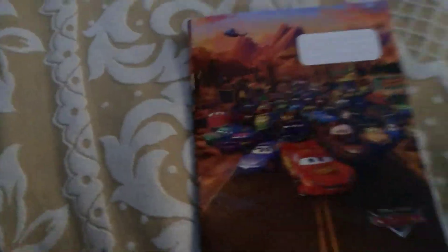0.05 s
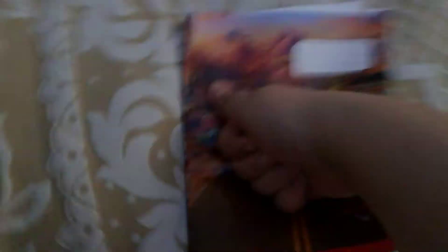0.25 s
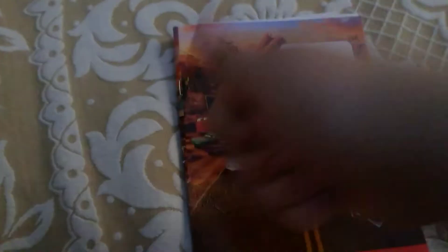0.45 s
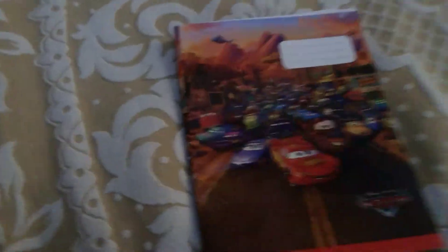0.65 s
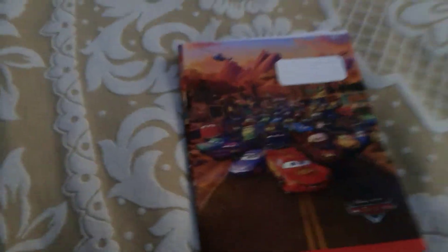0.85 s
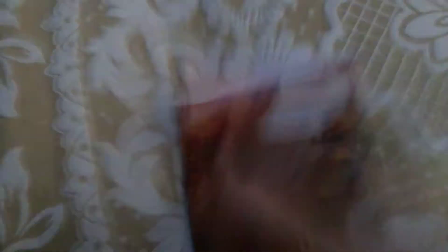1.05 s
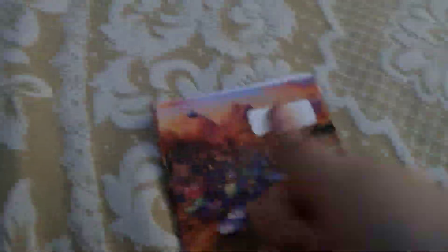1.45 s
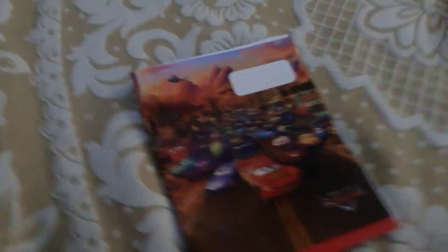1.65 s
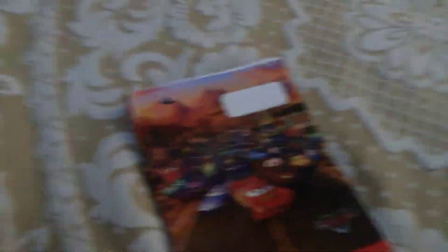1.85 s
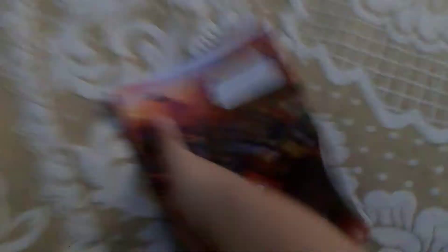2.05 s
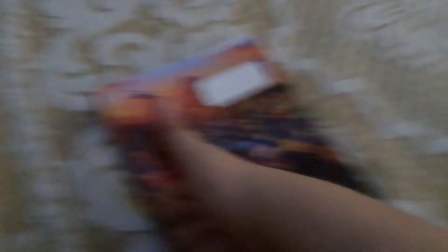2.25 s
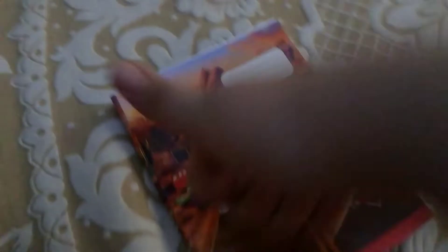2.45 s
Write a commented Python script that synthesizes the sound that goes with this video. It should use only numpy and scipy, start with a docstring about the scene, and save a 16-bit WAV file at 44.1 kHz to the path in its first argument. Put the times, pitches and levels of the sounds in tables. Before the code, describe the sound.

A fist thumps a notebook on a table at about 0.2, 1.1 and 2.1 seconds, each sharp hit overloading the close microphone and ringing briefly in a small room. Paper snaps accompany the last two blows, and a hollow tock comes at 1.35 seconds. A hand brushes softly, and the held camera clicks or creaks around 0.4, 1.6 and 2.4 seconds. A faint appliance whine lies underneath.

```python
"""A small, hard room, where a fist thumps a notebook on a cloth-covered table three times.
Each impact excites the damped modes of cover, pages and table, sets the room reverberating
and overloads the microphone of a hand-held camera. Between blows come a hollow tock, snaps of paper,
the friction noise of skin and sleeve, and the clicks and stick-slip creaks of the camera's case.
Still air and a faint appliance whine lie underneath."""
import sys
import numpy as np
from scipy import signal
from scipy.fft import rfft, irfft, next_fast_len
from scipy.io import wavfile

SR = 44100
rng = np.random.default_rng(int(sys.argv[2]) if len(sys.argv) > 2 else 0)


def persist_wave(psi):
    """Save psi, clipped to +-1, as 16-bit WAV."""
    counts = np.round(np.clip(psi, -1, 1) * 32767).astype(np.int16)
    wavfile.write(sys.argv[1], SR, np.atleast_2d(counts).T)


N = 110250


def amp(db):
    """Amplitude ratio of a level in decibels."""
    return 10 ** (np.asarray(db) / 20)


def unit_rms(x):
    """Normalisation to rms 1."""
    return x / np.sqrt(np.mean(x ** 2) + 1e-20)


def curve_at(points, hz):
    """Interpolation of (f/Hz, value) points on a logarithmic frequency axis."""
    f, values = np.transpose(points)
    return np.interp(np.log(hz + 1), np.log(f + 1), values)


def filtered(x, response):
    """Linear filtering: the spectrum of x times a frequency response."""
    size = next_fast_len(2 * N)
    return irfft(rfft(x, size) * response(np.fft.rfftfreq(size, 1 / SR)), size)[:N]


def minimum_phase(x, points):
    """Causal filtering by a (f/Hz, gain/dB) curve; folding the cepstrum gives the phase."""
    def response(hz):
        cepstrum = irfft(np.log(amp(curve_at(points, hz))))
        cepstrum[1:len(cepstrum) // 2] *= 2
        cepstrum[len(cepstrum) // 2 + 1:] = 0
        return np.exp(rfft(cepstrum))
    return filtered(x, response)


def noise(spectrum):
    """Gaussian noise of rms 1, shaped by a (f/Hz, relative level/dB) spectrum."""
    return unit_rms(filtered(rng.standard_normal(N), lambda hz: amp(curve_at(spectrum, hz))))


def clock():
    """Time of each sample in seconds."""
    return np.arange(N) / SR


def decay(t, t60):
    """Exponential damping: 60 dB down after t60 seconds."""
    return np.exp(-np.log(1000) * t / t60)


def swell(peak_s, rise_s, fall_s):
    """Gaussian envelope with separate widths for rise and fall."""
    t = clock() - peak_s
    return np.exp(-(t / np.where(t < 0, rise_s, fall_s)) ** 2)


def add(out, start_s, x):
    """Superposition of x on out after a delay."""
    i = round(start_s * SR)
    out[i:] += x[:N - i]


def ring(modes, scatter_db):
    """Free vibration: a sum of damped modes whose levels vary from contact to contact."""
    t = clock()
    return sum(amp(db + scatter_db * rng.standard_normal()) * decay(t, t60) * np.sin(2 * np.pi * hz * t)
               for hz, db, t60 in modes)


# spectrum of the still air (f/Hz, relative level/dB)
AIR_SPECTRUM = [(25, -30), (70, -15), (160, -2), (400, -5), (600, -8), (1000, -12.5), (1500, -17.5),
                (2000, -18), (2600, -24.5), (3800, -21.5), (6000, -33), (10000, -27.5), (15800, -30.5)]
# partials of the appliance whine (f/Hz, rms level/dB)
WHINE_PARTIALS = [(323, -63), (597, -67.5), (786, -71), (958, -68), (1604, -72), (1913, -65), (3208, -74),
                  (3505, -75), (3822, -73.5)]


def room_tone(air_db=-52, phase_step_rad=0.012):
    """Ambient noise: a broadband floor and faint partials whose phases take a random walk."""
    whine = np.zeros(N)
    for hz, db in WHINE_PARTIALS:
        drift = np.cumsum(rng.normal(0, phase_step_rad, N))
        whine += amp(db) * np.sqrt(2) * np.sin(2 * np.pi * hz * clock() + drift)
    return amp(air_db) * noise(AIR_SPECTRUM) + whine


# reverberation time of the room (f/Hz, T60/s)
ROOM_T60 = [(60, 0.48), (200, 0.55), (1000, 0.48), (4000, 0.48), (12000, 0.37)]


def room_decay(x):
    """Absorption: each band of x dies away with the room's reverberation time."""
    hz, t, bands = signal.stft(x, SR, nperseg=256)
    damped = bands * decay(t, curve_at(ROOM_T60, hz)[:, None])
    return signal.istft(damped, SR, nperseg=256)[1][:N]


def reverb(x, delay_s=0.019):
    """Diffuse reverberation: convolution with a decaying noise tail of unit energy."""
    tail = room_decay(rng.standard_normal(N)) * (clock() > delay_s)
    return signal.fftconvolve(x, tail / np.linalg.norm(tail))[:N]


# strokes of hand and sleeve over the cover, the first row a faint, dull wash of room noise dying away at the
# start (peak t/s, rise/s, fall/s, level/dB, relative hiss/dB)
BRUSH_STROKES = [(.02, .1, 0.084, -50, -24), (.354, 0.014, 0.016, -43.5, 1),
                 (0.416, 0.013, 0.0098, -35.5, -9), (.43, 0.05, 0.057, -37, -28),
                 (1.1, 0.035, 0.044, -60.5, -23.5), (1.67, 0.09, 0.11, -47.5, -24),
                 (1.42, 0.084, 0.089, -54, -7), (2.265, 0.032, 0.073, -40.5, -9),
                 (2.461, 0.04, 0.015, -49, 4)]
# spectra of a stroke's body and of its hiss (f/Hz, relative level/dB)
BRUSH_SPECTRUM = [(100, -10), (400, 1), (1500, -2), (2800, -6), (4500, -10), (6000, -22.5), (15000, -33)]
HISS_SPECTRUM = [(2000, -27), (5000, 2), (11000, -5), (16000, -13)]


def brushing():
    """Sliding friction: skin and cloth on paper make noise that swells and fades with each stroke; at the start
    a faint, dull wash of room noise dies away."""
    body, hiss = noise(BRUSH_SPECTRUM), noise(HISS_SPECTRUM)
    return sum(amp(db) * swell(s, rise, fall) * (body + amp(hiss_db) * hiss)
               for s, rise, fall, db, hiss_db in BRUSH_STROKES)


# creaks of the grip on the camera's case (peak t/s, rise/s, fall/s, level/dB)
GRIP_CREAKS = [(1.621, 0.024, 0.05, -41), (2.412, 0.025, 0.02, -37), (2.441, 0.0081, 0.004, -23.5),
               (2.458, 0.012, 0.01, -31)]
# spectrum of a creak (f/Hz, relative level/dB)
CREAK_SPECTRUM = [(100, -24), (500, -1), (1300, 3), (2800, 1), (4200, -5), (6000, -14), (11000, -19),
                  (16000, -38)]


def grip_creaks(slips_per_s=800, spread_db=11, rub_db=-7.5):
    """Stick-slip friction: fingers catch and release on the case in a fast, uneven pulse train."""
    relative_rate = 2 * np.repeat(rng.random(N), 40)[:N]  # each value holds for 40 samples
    slip_count = np.floor(np.cumsum(relative_rate) * slips_per_s / SR)
    slips = np.diff(slip_count, prepend=0) * amp(spread_db * rng.uniform(-1.4, 1, N))
    friction = unit_rms(minimum_phase(slips, CREAK_SPECTRUM)) + amp(rub_db) * noise(CREAK_SPECTRUM)
    return friction * sum(amp(db) * swell(s, rise, fall) for s, rise, fall, db in GRIP_CREAKS)


# pulses of the case under the fingers (t/s, level/dB at the source, bandwidth/Hz)
CASE_PULSES = [(0.3766, -14, 3000), (0.3972, -4, 1460), (0.4067, -7, 810), (0.6296, -24.5, 4470),
               (1.4896, -27.5, 4000), (1.5164, -14.5, 810), (1.5906, -18.5, 690), (1.6245, -8, 1900),
               (1.626, -15, 3240), (1.6275, -15.5, 2800), (1.6342, -0.5, 2170), (1.6381, -16, 2420),
               (1.6466, -15.5, 1640), (1.8197, -24, 600), (1.8313, -14, 1300), (2.0538, -18, 1070),
               (2.3048, -22.5, 593), (2.3235, -17.5, 940), (2.3298, -19, 542), (2.335, -23.5, 450),
               (2.3914, -18, 2980), (2.4365, -14, 2300), (2.4382, -10, 2900), (2.4396, -13, 2400),
               (2.4488, -21.5, 3000), (2.4532, -23, 2800), (2.4561, -20.5, 1100)]
# transmission through the case (f/Hz, gain/dB)
CASE_RESPONSE = [(30, -59), (120, -10), (280, 0), (700, -2), (1500, 2.5), (3500, 6.5), (5000, 3.5),
                 (6500, -14), (15000, 5)]


def case_clicks():
    """Structure-borne sound: pulses reach the microphone through the case; the wider, the duller."""
    t = clock()
    pulses = sum(amp(db) / (1 + (np.pi * hz * (t - s)) ** 2) ** 2 for s, db, hz in CASE_PULSES)
    return minimum_phase(pulses, CASE_RESPONSE)


# modes of the hollow tock (f/Hz, level/dB, T60/s)
TOCK_MODES = [(942, 8, 0.0099), (815, -1, 0.012), (2250, -6, 0.0091)]
# spectrum of the tick at its onset (f/Hz, relative level/dB)
TICK_SPECTRUM = [(2800, -18), (3600, 2), (7500, -2), (9000, -21), (15000, -32)]


def tock(start_s=1.3531, rise_s=0.002, tick_db=-20.5, room_db=-10.5):
    """Heavily damped resonance: a dry tick and a hollow knock of a few cycles, then reverberation."""
    out, t = np.zeros(N), clock()
    knock = ring(TOCK_MODES, scatter_db=2) * (1 - np.exp(-(t / rise_s) ** 2))
    tick = amp(tick_db) * noise(TICK_SPECTRUM) * decay(t, t60=0.0098)
    direct = tick + knock
    add(out, start_s, direct + amp(room_db) * reverb(direct) * decay(t, t60=1.1))
    return out


# snaps of the paper (t/s, level/dB, f/Hz)
PAPER_SNAPS = [(1.1481, -4, 3900), (2.0872, -14, 5950), (2.109, -5, 4200), (2.125, -6, 3970),
               (2.135, -11, 5000), (2.1497, -11.5, 7900), (2.1511, -3.5, 4700), (2.2821, -26, 8100),
               (2.4054, -29, 4000)]
# spectrum of their crackle (f/Hz, relative level/dB)
CRACKLE_SPECTRUM = [(300, -10), (4500, 16), (9000, -6), (15000, -9)]


def paper_snaps(rise_s=0.0002, crackle_db=-7, room_db=-21):
    """Elastic recoil: cover and pages spring back, each with a few bright cycles and a crackle."""
    out, t = np.zeros(N), clock()
    envelope = decay(t, t60=0.0026) * (1 - np.exp(-(t / rise_s) ** 2))
    envelope /= envelope.max()
    for s, db, hz in PAPER_SNAPS:
        crackle = amp(crackle_db) * noise(CRACKLE_SPECTRUM)
        add(out, s, amp(db) * envelope * (np.sin(2 * np.pi * hz * t) + crackle))
    return out + amp(room_db) * reverb(out)


# spectrum of the room's response to a blow (f/Hz, relative level/dB)
REFLECTION_SPECTRUM = [(30, -24), (100, -5.5), (180, 3.5), (320, 0), (420, -1), (520, 1.5), (700, -1),
                       (1300, 1.5), (2500, -6.5), (4400, -9), (5800, -20.5), (9000, -24.5), (15500, -36)]


def room_reflections(rise_s=0.0025, echo_s=0.038, echo_db=-2, echo_rise_s=0.0037):
    """Reflection: the diffuse field of a blow builds and decays, joined by the far wall's echo."""
    t = clock()
    field = room_decay(noise(REFLECTION_SPECTRUM)) * (1 - np.exp(-t / rise_s))
    echo = noise(REFLECTION_SPECTRUM) * decay(t, t60=0.13) * (1 - np.exp(-t / echo_rise_s))
    add(field, echo_s, amp(echo_db) * echo)
    return field


# spectrum of the slap on the cover (f/Hz, relative level/dB)
SLAP_SPECTRUM = [(30, -13.5), (100, -15), (270, -1.5), (400, 2), (700, 1), (1250, 4), (2200, -3.5),
                 (4300, -1), (6000, -8.5), (10000, -22.5), (16000, -30)]


def cover_slap(cavity_hz, cover_hz, burst_db=8.5):
    """Impact noise: a burst, with the resonances of the air cupped under the hand and the stiff cover."""
    cavity_mode, cover_mode = (cavity_hz, 1.5, 0.019), (cover_hz, -0.5, 0.024)  # f/Hz, level/dB, T60/s
    resonances = ring([cavity_mode, cover_mode], scatter_db=-2)
    return resonances + amp(burst_db) * noise(SLAP_SPECTRUM) * decay(clock(), t60=0.023)


# blows of the fist (t/s, slap level/dB, room level/dB, thump f/Hz, thump level/dB,
# cavity f/Hz, cover f/Hz, then gain/dB in the bass, middle, upper middle and treble)
FIST_BLOWS = [(.2071, -1, -1.5, 287, 2.5, 1114, 3450, 4, 1, -2, 1.5),
              (1.1363, -2.5, 1, 269, 0, 1296, 3765, -2.5, 0.5, -2, 0),
              (2.0736, -1.5, 1.5, 179, -13, 972, 4095, -9, -2.5, -2, 2)]
# centres of those four bands (f/Hz)
BAND_CENTRES = (200, 1100, 2200, 4200)
# modes rung by each blow, of the table under the notebook and, at 198 and 260 Hz, of the room (f/Hz, level/dB,
# T60/s)
THUD_MODES = [(164.2, -15.5, 0.52), (198.3, -11.5, 0.46), (259.7, -11, 0.37), (331.6, -14, .3),
              (514, -15, 0.37), (521, -5.5, 0.058), (820, -6.5, 0.062), (1070, -16, 0.27),
              (1220, -26, 0.18), (1550, -14.5, 0.28), (1993, -19.5, 0.53)]
# spectrum of the air squeezed from the pages (f/Hz, relative level/dB)
PUFF_SPECTRUM = [(20, -8.5), (60, -5), (110, -2), (220, -6), (1000, -50)]


def fist_blows(rise_s=0.001, table_db=-7.5, reflections_db=-11.5, puff_db=-31.5):
    """Impulsive excitation: the cover slaps, the pages give way and expel air, table and room ring."""
    out, t = np.zeros(N), clock()
    attack = 1 - np.exp(-t / rise_s)
    for s, slap_db, room_db, thump_hz, thump_db, cavity_hz, cover_hz, *band_db in FIST_BLOWS:
        slap = amp(slap_db) * attack * cover_slap(cavity_hz, cover_hz)
        page_thump = amp(thump_db) * np.sin(2 * np.pi * thump_hz * t) * decay(t, t60=0.039)
        table_thud = amp(table_db) * ring(THUD_MODES, scatter_db=1.5)
        room = amp(reflections_db + room_db) * room_reflections()
        puff = amp(puff_db) * noise(PUFF_SPECTRUM) * decay(t, t60=0.18)
        timbre = [(87.5, 0), *zip(BAND_CENTRES, band_db)]  # flat below 87.5 Hz for every blow
        add(out, s, attack * (puff + page_thump) + minimum_phase(slap + table_thud + room, timbre))
    return out


def scene():
    """Superposition: the pressures of all sources add at one microphone."""
    impacts = fist_blows() + case_clicks() + paper_snaps() + tock()
    return (impacts + brushing() + grip_creaks() + room_tone())[None]


def record(dry, ceiling=0.68, cutoff_hz=16000):
    """Saturation: the input clips hard on the blows, and a steep low-pass limits the bandwidth."""
    clipped = np.clip(dry[0], -ceiling, ceiling)
    return filtered(clipped, lambda hz: 1 / (1 + (hz / cutoff_hz) ** 120))[None]


dry = scene()
out = record(dry)
persist_wave(out)
```